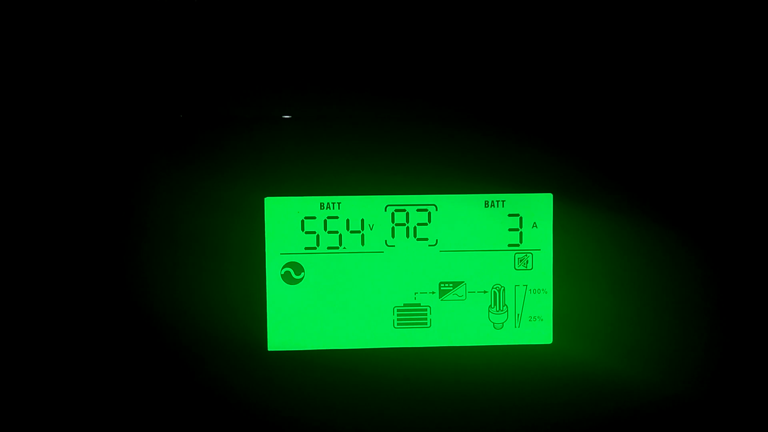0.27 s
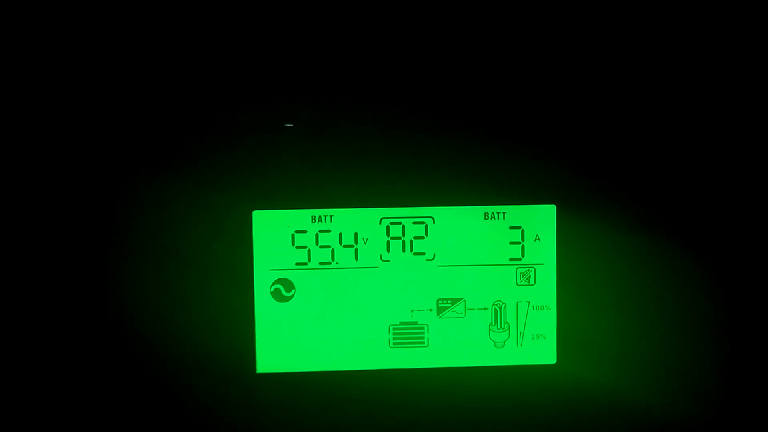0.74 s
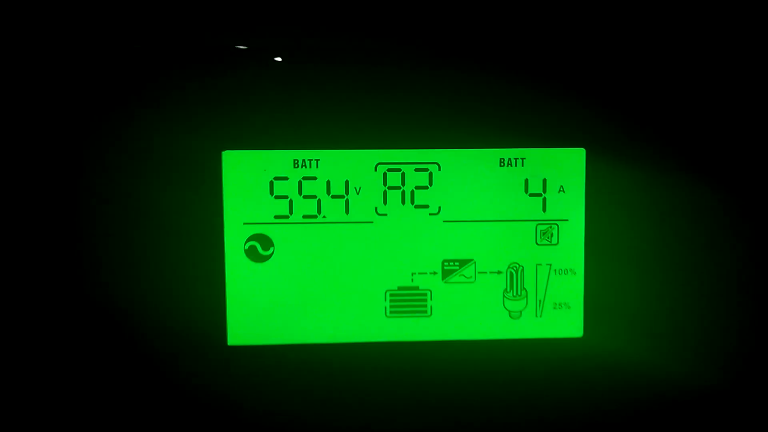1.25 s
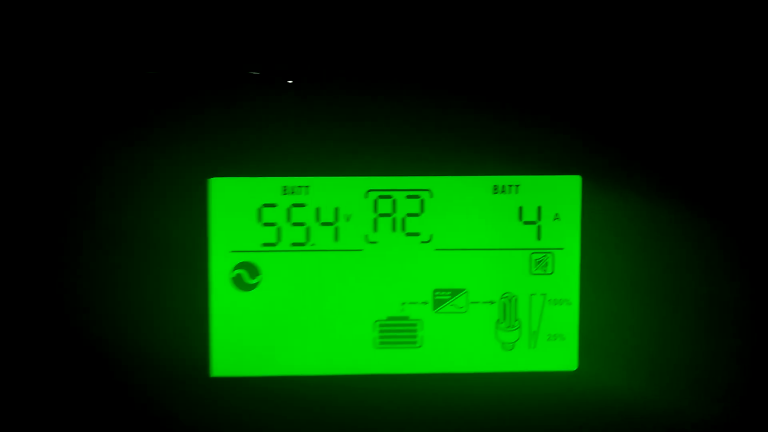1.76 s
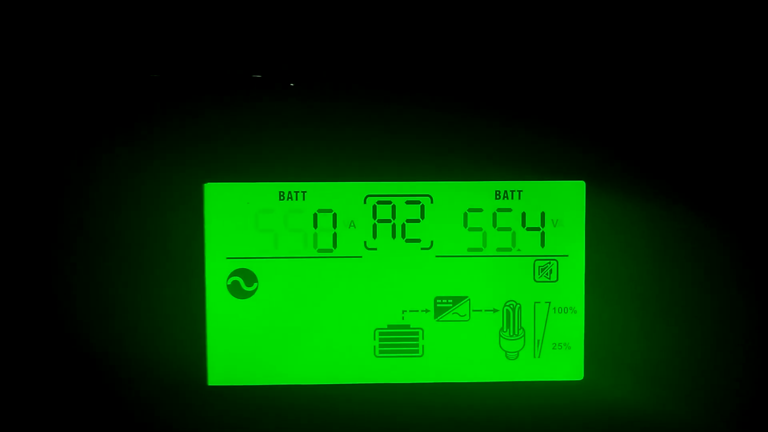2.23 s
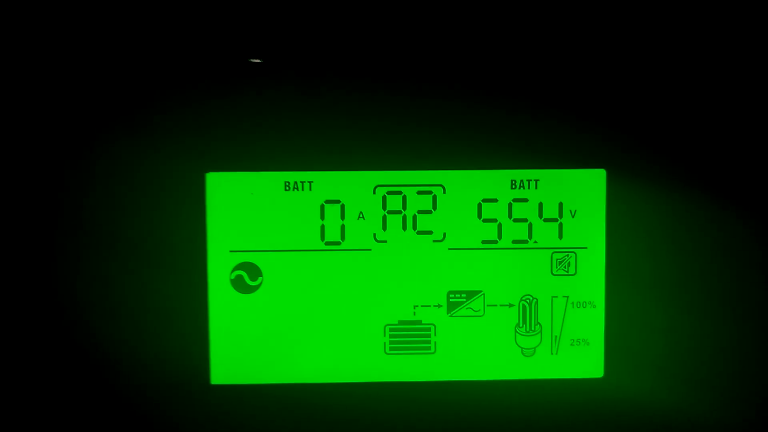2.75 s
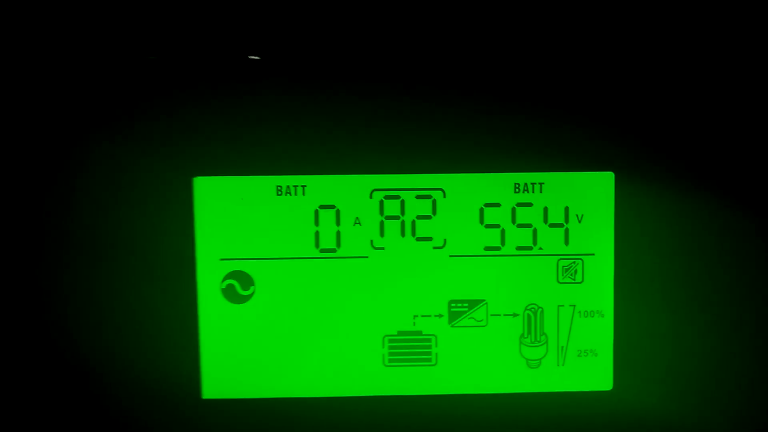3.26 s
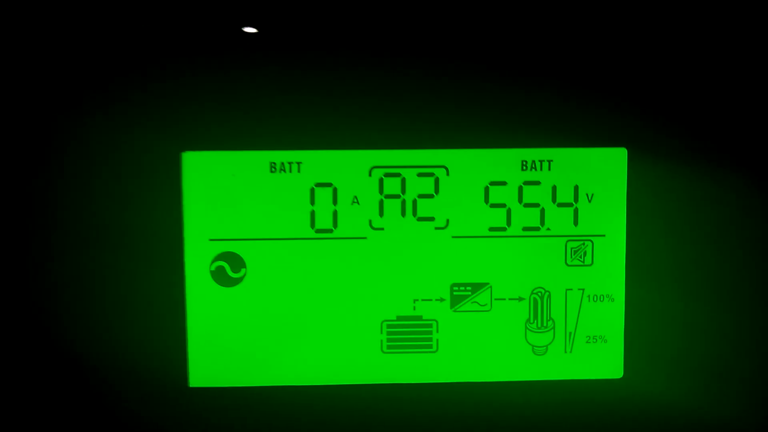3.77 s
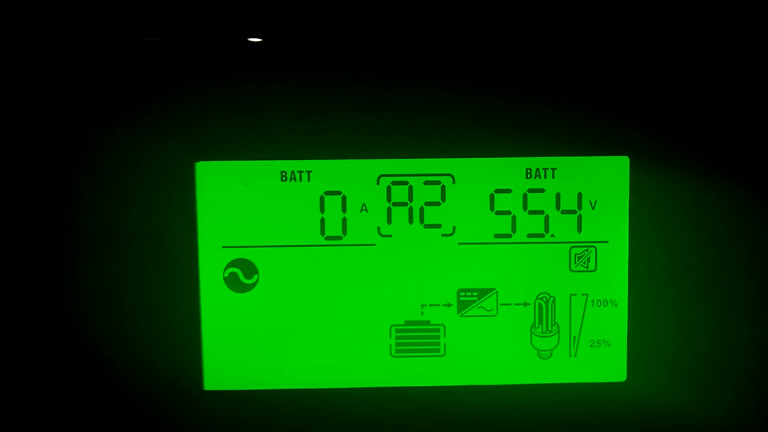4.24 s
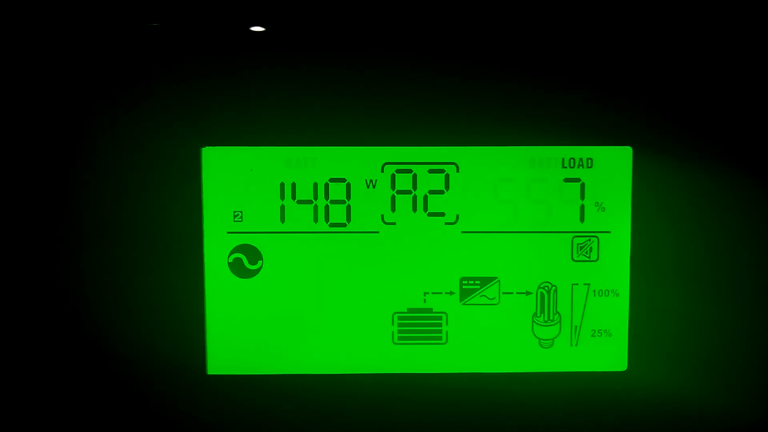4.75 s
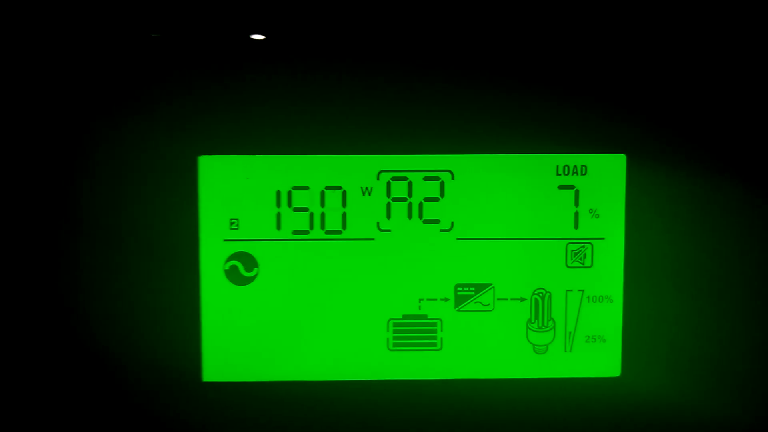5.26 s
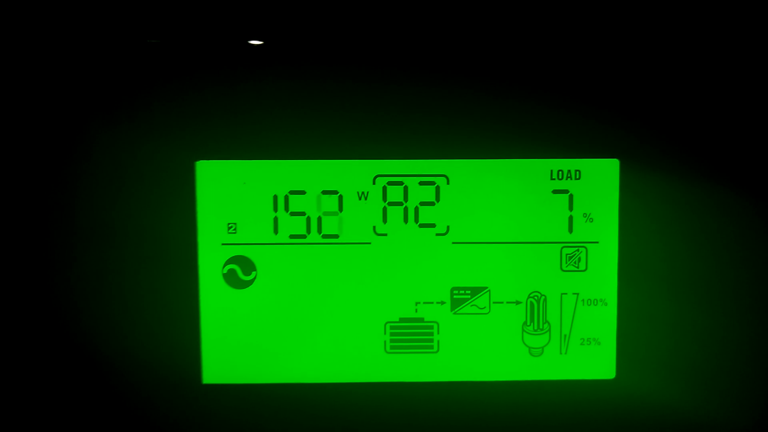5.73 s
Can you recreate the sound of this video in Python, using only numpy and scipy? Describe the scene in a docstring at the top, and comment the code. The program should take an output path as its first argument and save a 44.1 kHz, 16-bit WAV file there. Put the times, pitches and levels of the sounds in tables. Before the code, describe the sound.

Two sharp double clicks of a stiff device button, seconds apart, over a steady hollow cooling-fan hum with faint soft ticks.

```python
"""First the low, hollow whirr of a cooling fan in a quiet room; then an inverter's panel button is pressed
and let go, twice. Each stroke puts a dull push and a switch snap through one struck panel: case modes,
crack, ring and room. Soft ticks around the strokes are short coloured noise bursts; faint squeaks are
noise in narrow resonances. The fan is shaped stereo noise with tuned resonances, plus a narrow whine
that comes forward before the middle and stays."""
import sys
import numpy as np
from scipy import signal
from scipy.fft import rfft, irfft, next_fast_len
from scipy.io import wavfile

SR = 44100
rng = np.random.default_rng(int(sys.argv[2]) if len(sys.argv) > 2 else 0)


def dump(signal):
    """Clip the signal to [-1, 1] and save it as 16-bit WAV at the path in sys.argv[1]."""
    limited = np.clip(np.atleast_2d(signal).T, -1, 1)
    pcm = np.round(limited * 32767).astype(np.int16)
    wavfile.write(sys.argv[1], SR, pcm)


N = 264644

# button strokes, down and up in turn:
# [t/s, push level/dB, push top f/Hz, snap level/dB, snap delay t/s, snap bottom f/Hz, snap top f/Hz]
BUTTON_STROKES = [(1.948, -2, 2020, -2.5, 0, 1700, 14400), (2.1388, 2.5, 1350, -15.5, 0.0011, 1500, 13000),
                  (4.2655, -2.5, 1500, 1, 0, 2800, 17000), (4.4411, 3, 1320, -14, 0.0017, 1710, 17000)]
# strong modes of the case: [f/Hz, width f/Hz, level/dB, signed share at the right port]
CASE_MODES = [(57, 14, 5.5, 0.13), (90, 27, 13.5, -1.2), (109, 5.3, 20, -.1), (215, 14, 13, -0.58),
              (244, 19, 14, -0.88), (277, 18, 10.5, -0.95), (333, 12, 6.5, -1), (342, 38, 5, -0.71),
              (488, 30, 3.5, -0.48), (559, 13, 13, -0.9), (688, 66, 5, -0.62), (778, 19, 16.5, -0.14),
              (881, 26, 10.5, -0.022), (953, 16, 16.5, -0.1), (983, 35, 12.5, -0.2), (1084, 58, 8.5, -.2),
              (1159, 20, 5, 0.32), (1270, 15, 4.5, 0.29), (1363, 22, 6, -0.3), (1463, 24, 9, -0.89),
              (1585, 24, 9, -1.1), (1834, 26, 14.5, -0.62), (2060, 21, 17, -0.2), (2220, 87, 15, 0.37),
              (2390, 110, 15, -0.15), (2516, 29, 14.5, -.35), (2836, 40, 14.5, 0.71), (2930, 60, 10, 0.58),
              (3395, 120, 7.5, -0.093)]
# modes of the small, stiff switch and its cap: [f/Hz, width f/Hz, level/dB, signed share at the right port]
SWITCH_MODES = [(4460, 60, 13.5, 0.86), (4630, 68, 10, -0.48), (4920, 70, 4, -0.12), (5370, 90, 9.5, .9),
                (5320, 120, 11, .9), (6320, 35, 11, 0.48), (7270, 60, 12.5, -0.074),
                (7340, 18, 14.5, 0.077), (7700, 55, 15.5, 0.23), (8090, 50, 12, 0.28),
                (8300, 69, 18, 0.031), (9970, 45, 15.5, -0.069), (10670, 35, 16, 0.19),
                (10800, 61, 14.5, 0.0038), (11430, 32, 19, .1), (12540, 68, 13.5, 0.65),
                (12200, 91, 13, 0.055), (12660, 51, 16, 0.53)]
# crowded weak modes and the room: [f/Hz, facia crack level/dB, case ring level/dB, room level/dB]
DIFFUSE_COLOUR = [(30.02, -29, -28.5, -24.5), (106.8, -19, -21, -6), (248, -13, -15, 0.5),
                  (400, -12.5, -13.5, -8), (640, -10.5, -9, -3), (990, -1.5, -0.5, -8), (1320, -5, 1, -12),
                  (2120, 9.5, 6.5, -10), (3322, 5.5, -1, -14.5), (5000, 3.5, 0.5, -13), (6800, 8, -4, -15),
                  (9600, 5.5, -3.5, -13.5), (11600, 7.5, 3.5, -10), (13200, 6, -2.5, -13),
                  (15500, -1.5, -20.5, -26)]
# the right port faces away from the panel: [f/Hz, level/dB]
RIGHT_PORT_SHADE = [(100, 2), (500, -4), (900, -8), (2200, -7.5), (3400, -2), (5200, -4.5), (7500, -9),
                    (11000, -20), (15000, -22)]
# soft ticks: [t/s, tick level/dB, tick lower edge f/Hz, knock level/dB, dull bump level/dB]
SOFT_TICKS = [(0.9705, 0.5, 9500, -0.5, -6), (3.6382, -6.5, 5280, -12.5, 2),
              (4.0240, -11, 5613, -13.5, -2.5), (5.8830, -9.5, 5500, -10, -3)]
# spectra of the three parts of a tick: [f/Hz, tick level/dB, knock level/dB, bump level/dB]
TICK_COLOUR = [(30, -39, -50.5, -13), (80, -38, -49, -3.5), (250, -35, -31, 2), (452.6, -31.5, -24.5, -4.5),
               (810, -28, -11, -7.5), (1370, -28.5, -26, -24), (2100, -29.5, -16.5, -26.5),
               (3300, -27, -29.5, -41.5), (5500, -15.5, -26, -53), (8100, -17, -25, -58.5),
               (11500, -12, -35, -68), (15500, -20, -46.5, -61)]
# faint squeaks and pips: [centre t/s, f/Hz, length t/s, level/dB]
SQUEAKS = [(1.225, 1990, 0.072, -75.5), (1.302, 1990, 0.041, -75.5), (1.377, 2086, 0.023, -67),
           (3.693, 1404, 0.017, -68)]
# fan air and hiss: [f/Hz, level/dB, right relative level/dB, left-right likeness (-1 to 1)]
FAN_AIR = [(20, -73, 5, -.2), (40.3, -44, -2, -0.68), (57.6, -30.5, -3, -0.54), (98, -46.5, 3, -0.35),
           (178, -40.5, -0.5, -.75), (332, -48.5, -0.5, -0.68), (630, -50, -0.5, -0.57),
           (850, -52, -8, -0.1), (1190, -60, -3.5, -0.26), (2380, -65, -6, 0), (3360, -74.5, 1, 0.057),
           (5600, -76.5, 0, -0.12), (11500, -72, -2, 0.063), (15500, -71.5, -3, 0)]
# resonances that the fan stirs: [f/Hz, width f/Hz, level/dB]
FAN_MODES = [(118, 14, -47.5), (218.4, 10, -27), (267, 9, -31.5), (283, 8.7, -29.5), (370, 17, -42.5),
             (436, 4.9, -49), (507, 9.5, -42), (614, 23, -45), (753, 8.9, -34)]
# soft swells of the hiss: [centre t/s, length t/s, rise level/dB]
HISS_SWELLS = [(1.15, 0.66, 5.5), (2.3, .3, 5), (2.85, .45, 2.5), (4.35, .5, 4), (5.05, .55, 2.5)]

TAIL = np.arange(SR) / SR   # time axis of every struck sound, s
CRACK_T60_S, RING_T60_S, ROOM_T60_S = 0.034, 0.17, 0.59
PORT_LAG_S = .0003
SLOW_MODE_HZ = 600   # modes below this move the whole case at once
SPREAD_HZ = 4000   # bending waves are slower below this pitch and faster above it
WHIRR_START_DB, WHIRR_FULL_DB, WHIRR_GROW_S = -4, -0.24, 3.1   # grows slowly, then holds
HISS_DB = -1   # between the swells
WHINE_HZ, WHINE_WIDTH_HZ = 2456, 80
WHINE_FAINT_DB, WHINE_FULL_DB = -67, -58.5
WHINE_RISE_AT_S, WHINE_RISE_S = 2.55, 0.26
CUTOFF_HZ = 15800


def button():
    """Every stroke drives the same panel: the push feeds its lows, the snap of the switch its highs."""
    modes = struck_modes(spread_s=.0017)
    left = modes[0] + panel_response(room_db=1.5)
    lag_s = round(PORT_LAG_S * SR) / SR
    left = np.interp(TAIL - lag_s, TAIL, left, left=0)   # the left port hears it a little later
    right = modes[1] + colour(panel_response(room_db=4.0), RIGHT_PORT_SHADE)
    panel = np.stack([left, right])
    out = np.zeros((2, N))
    for s, push_db, push_hz, snap_db, delay_s, bottom_hz, top_hz in BUTTON_STROKES:
        push = -cut(panel, push_hz, "low")
        add(out, s, from_db(push_db) * push)
        snap = cut(panel, bottom_hz, "high", order=1)
        snap = cut(snap, top_hz, "low", order=1)
        add(out, s + delay_s, from_db(snap_db) * snap)
    return out


def struck_modes(spread_s):
    """A blow crosses the panel and reaches each mode a moment apart; many modes oppose at the two ports."""
    out = np.zeros((2, len(TAIL)))
    for k, (hz, width, db, right) in enumerate(CASE_MODES + SWITCH_MODES):
        delay_s = rng.uniform(0, spread_s) * np.sqrt(SPREAD_HZ / hz)
        if hz <= SLOW_MODE_HZ:
            delay_s = 0
        blow = signal.unit_impulse(len(TAIL), int(delay_s * SR))
        ringing = (-1) ** k * from_db(db) * resonance(blow, hz, width)
        out += ringing * np.array([[1], [right]])
    return out


def panel_response(room_db):
    """The diffuse part of a unit blow at one port: crack of the facia, ring of the case, room."""
    crack = colour(dying_noise(CRACK_T60_S, rise_s=0.00057), DIFFUSE_COLOUR, column=1)
    ring = colour(dying_noise(RING_T60_S, rise_s=.001), DIFFUSE_COLOUR, column=2)
    room = colour(dying_noise(ROOM_T60_S, rise_s=0.0052), DIFFUSE_COLOUR, column=3)
    return crack + ring + from_db(room_db) * room


def ticks():
    """Light touches near the left port: a thin bright tick, a small knock and a dull bump under them."""
    out = np.zeros((2, N))
    for s, tick_db, edge_hz, knock_db, bump_db in SOFT_TICKS:
        ports = contact(direct_db=2.5, room_db=-2.5), contact(direct_db=-21, room_db=-14.5)
        tick = np.stack([colour(port, TICK_COLOUR, column=1) for port in ports])
        tick = cut(tick, edge_hz, "high", order=5)
        ports = contact(direct_db=-0.5, room_db=0.5), contact(direct_db=-13, room_db=-3.5)
        knock = np.stack([colour(port, TICK_COLOUR, column=2) for port in ports])
        bump = colour(dying_noise(t60=0.25, rise_s=.008), TICK_COLOUR, column=3)
        bump = bump * np.array([[1], [-.3]])   # weaker and inverted on the right
        add(out, s, from_db(tick_db) * tick + from_db(knock_db) * knock + from_db(bump_db) * bump)
    return out


def contact(direct_db, room_db):
    """A short contact and its trace in the room, still uncoloured."""
    direct = dying_noise(t60=0.039, rise_s=0.00054)
    room = dying_noise(t60=0.41, rise_s=.003)
    return from_db(direct_db) * direct + from_db(room_db) * room


def chirps():
    """A few faint, rough squeaks: noise in a narrow resonance under a bell-shaped envelope."""
    t, out = np.arange(N) / SR, 0
    for s, hz, length_s, db in SQUEAKS:
        squeak = resonance(rng.standard_normal(N), hz, width=53)
        envelope = np.exp(-(2 * (t - s) / length_s) ** 2)
        out = out + from_db(db) * envelope * squeak / squeak.std()
    return out * from_db([[-1], [-5]])


def fan():
    """Smooth air noise and hollow resonances; the lows reach the two ports in opposite phase."""
    whirr_db = ramp(0, WHIRR_GROW_S, WHIRR_START_DB, WHIRR_FULL_DB)
    hiss_db = HISS_DB + swells(HISS_SWELLS)
    # the balance of mid and side noise sets how alike the ports are at each pitch
    mid, side = rfft(rng.standard_normal((2, N)))
    alike = np.clip(at_hz(FAN_AIR, N, column=3), -1, 1)
    mid = mid * np.sqrt((1 + alike) / 2)
    side = side * np.sqrt((1 - alike) / 2)
    right_gain = from_db(at_hz(FAN_AIR, N, column=2))
    ports = np.stack([mid + side, (mid - side) * right_gain])
    air = irfft(ports * from_db(at_hz(FAN_AIR, N, column=1)), N)
    hollow = resonate(rng.standard_normal(N), FAN_MODES) * waver(rate=6, depth_db=0.85)
    low_air = cut(air, 2800, "low", order=1)
    hiss = air - low_air
    whirr = low_air + np.stack([hollow, -from_db(-7.5) * hollow])
    return whirr * from_db(whirr_db) + hiss * from_db(hiss_db)


def whine():
    """A narrow band of fan noise, faint at first, that comes forward and stays; softer on the right."""
    level_db = ramp(WHINE_RISE_AT_S, WHINE_RISE_S, WHINE_FAINT_DB, WHINE_FULL_DB)
    band = resonance(rng.standard_normal((2, N)), WHINE_HZ, WHINE_WIDTH_HZ)
    return from_db(level_db) * band * from_db([[0], [-8]])


def dying_noise(t60, rise_s):
    """Countless modes that swell and die together, as enveloped noise; expected energy 1."""
    shape = from_db(-60 * TAIL / t60) * (1 - np.exp(-TAIL / rise_s))
    return shape * rng.standard_normal(len(TAIL)) / np.sqrt(np.sum(shape ** 2))


def resonance(x, hz, width):
    """Two-pole band-pass with gain 1 on top; a narrower width (Hz) rings longer."""
    r = np.exp(-np.pi * width / SR)
    poles = [1, -2 * r * np.cos(2 * np.pi * hz / SR), r * r]
    return (1 - r * r) / 2 * signal.lfilter([1, 0, -1], poles, x + 1e-18)


def resonate(x, modes):
    """Parallel resonances with alternating signs."""
    out = 0
    for k, (hz, width, db) in enumerate(modes):
        out = out + (-1) ** k * from_db(db) * resonance(x, hz, width)
    return out


def colour(x, table, column=1):
    """Causal (minimum-phase) filter that follows a dB column."""
    size = 2 * next_fast_len(len(x))
    cepstrum = irfft(np.log(from_db(at_hz(table, size, column=column))))
    # folding the cepstrum onto positive time gives minimum phase
    cepstrum[1:size // 2] *= 2
    cepstrum[size // 2 + 1:] = 0
    return irfft(rfft(x, size) * np.exp(rfft(cepstrum)))[:len(x)]


def at_hz(table, size, column=1):
    """One column of a spectrum table on the bins of a transform, read along log frequency."""
    rows, hz = np.array(table), np.arange(size // 2 + 1) * SR / size
    return np.interp(np.log(hz + 1), np.log(rows[:, 0]), rows[:, column])


def cut(x, hz, kind, order=2):
    """Butterworth low- or high-pass."""
    sos = signal.butter(order, min(hz, SR * .49), kind, fs=SR, output="sos")
    return signal.sosfilt(sos, x + 1e-18)


def waver(rate, depth_db):
    """A gain that wanders slowly and at random, below a rate in Hz."""
    slow = cut(rng.standard_normal(N + SR), rate, "low")[SR:]   # skip the filter's first second
    return from_db(depth_db * slow / slow.std())


def ramp(start_s, length_s, before, after):
    """A level that holds, moves evenly to a new value and holds again."""
    progress = np.clip((np.arange(N) / SR - start_s) / length_s, 0, 1)
    return before + (after - before) * progress


def swells(rows):
    """Smooth, bell-shaped rises of a level, in dB."""
    t = np.arange(N) / SR
    return sum(db * np.exp(-(2 * (t - s) / length_s) ** 2) for s, length_s, db in rows)


def from_db(db):
    """Decibels to gain."""
    return 10 ** (np.asarray(db) / 20)


def add(out, s, sound):
    """Mix a sound in at a time in seconds."""
    start = int(round(s * SR))
    part = sound[..., :max(N - start, 0)]
    out[..., start:start + part.shape[-1]] += part


def scene():
    """Button, ticks and squeaks over the fan and its whine."""
    return button() + ticks() + chirps() + fan() + whine()


def record(dry):
    """The top is cut steeply by an elliptic low-pass."""
    steep = signal.ellip(10, .2, 80, CUTOFF_HZ, fs=SR, output="sos")
    return signal.sosfilt(steep, dry)


dry = scene()
out = record(dry)
dump(out)
```